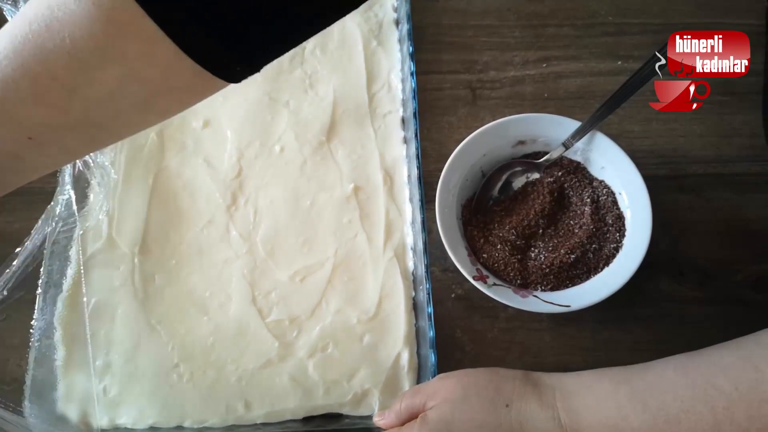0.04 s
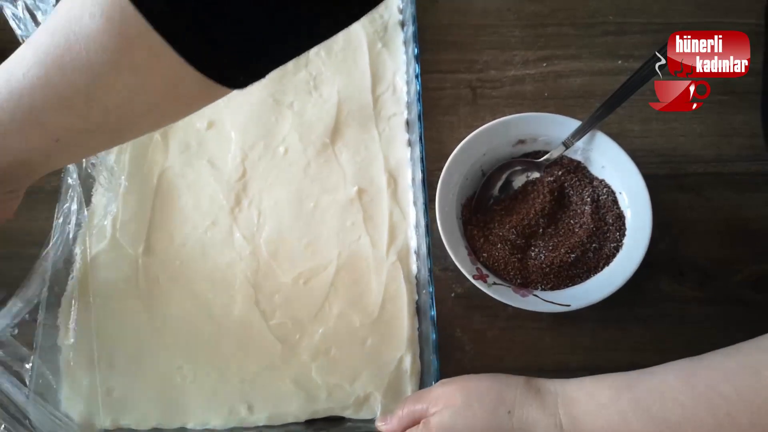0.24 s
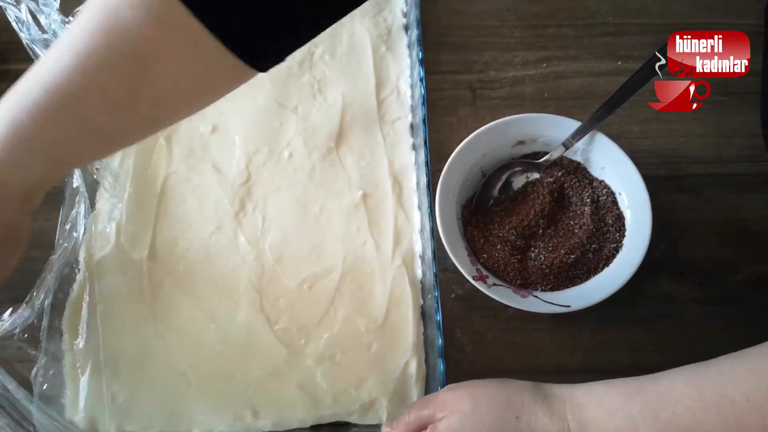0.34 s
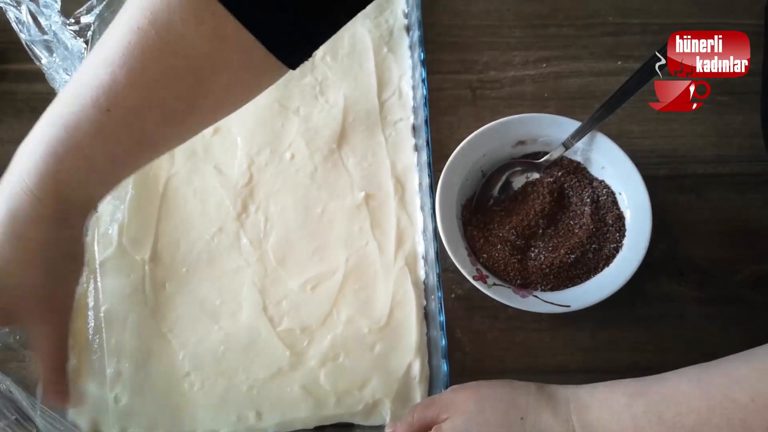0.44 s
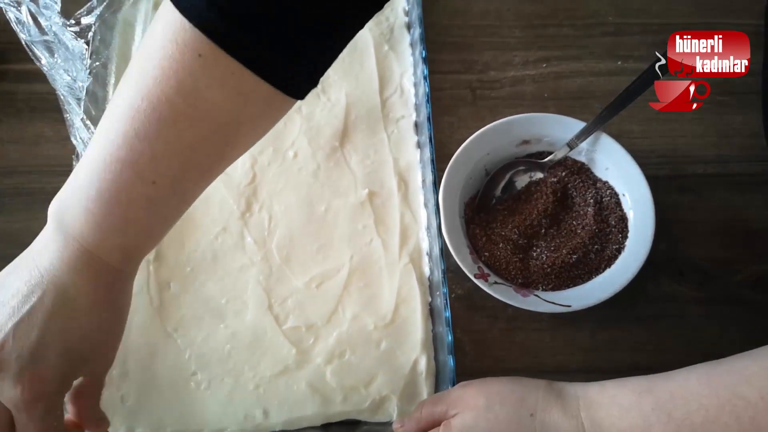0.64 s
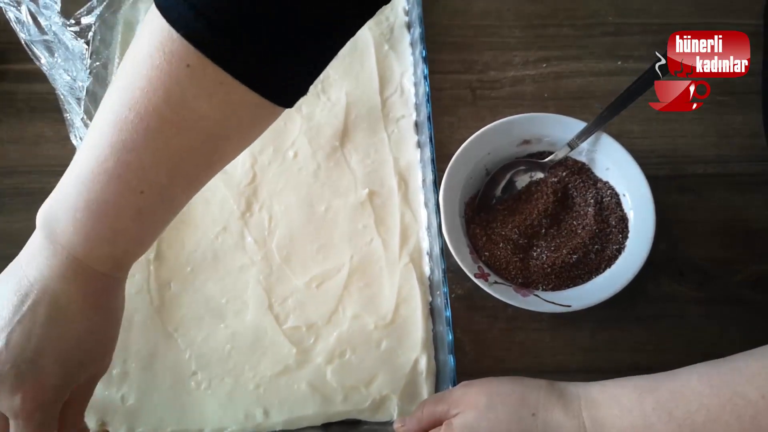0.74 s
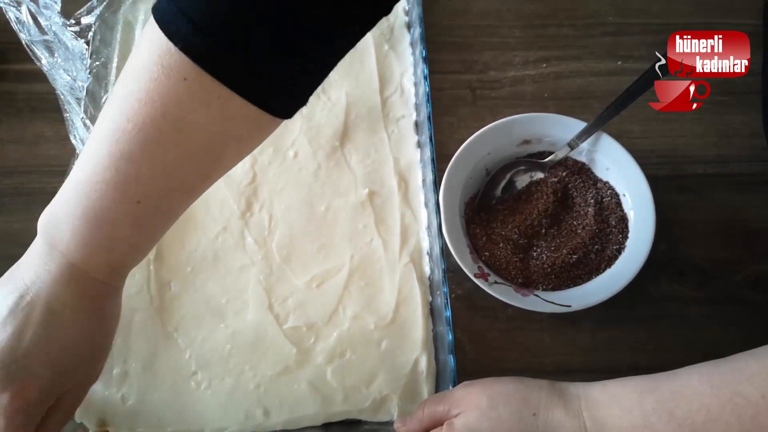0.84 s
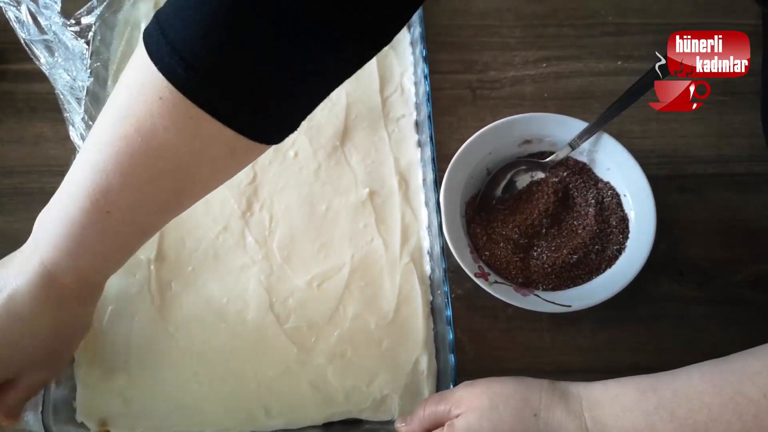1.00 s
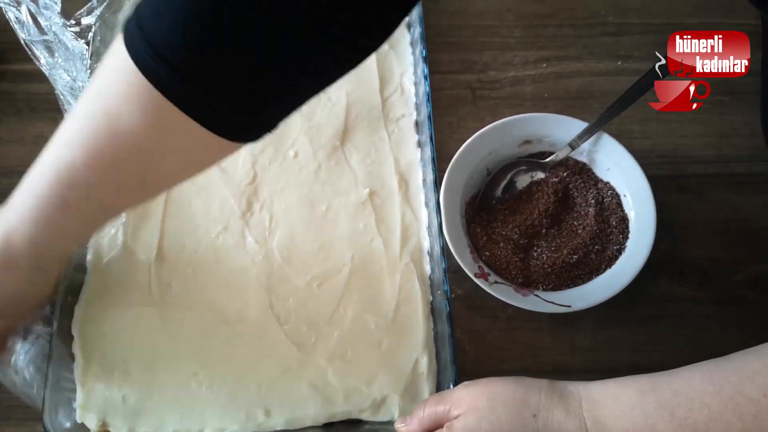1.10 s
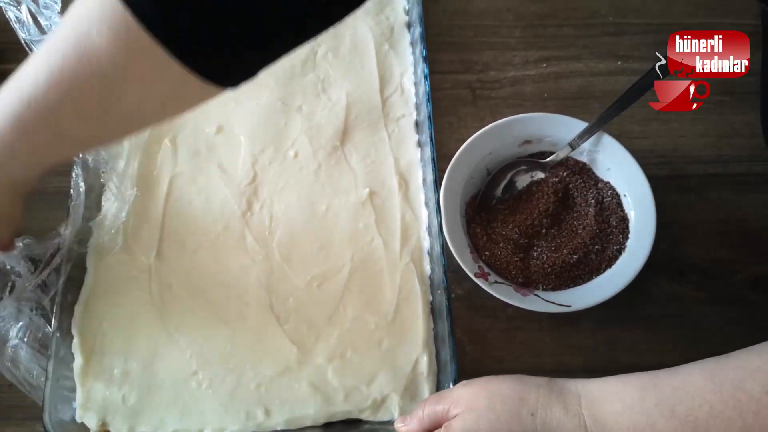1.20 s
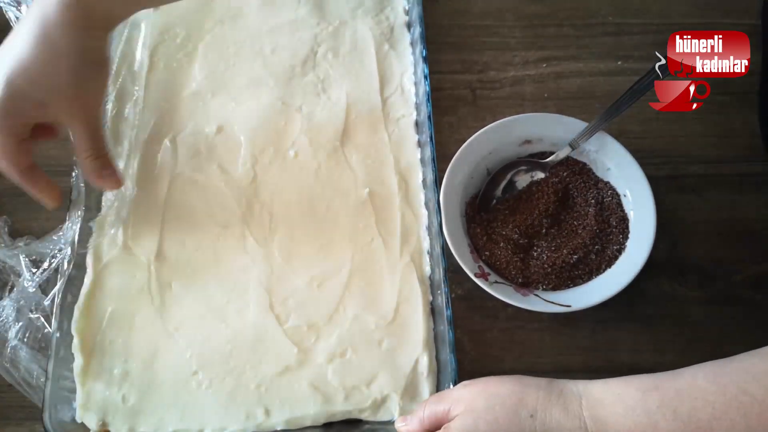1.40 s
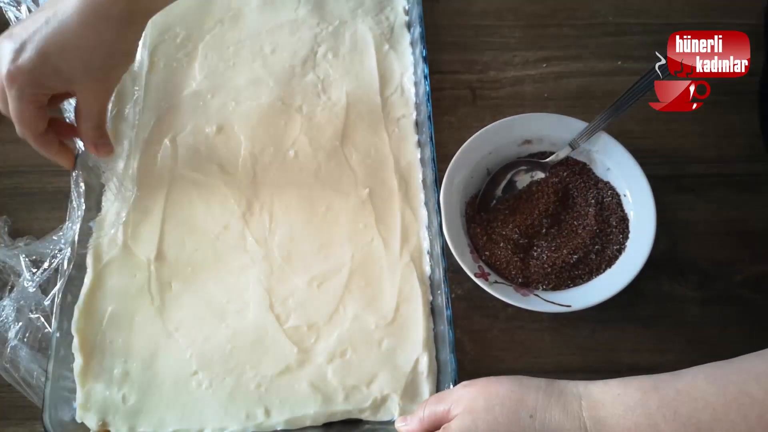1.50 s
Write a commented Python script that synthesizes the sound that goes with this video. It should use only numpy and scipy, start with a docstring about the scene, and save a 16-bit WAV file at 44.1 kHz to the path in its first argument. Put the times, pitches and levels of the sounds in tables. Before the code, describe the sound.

Cling film crinkling off a glass dish, two early knocks on wood, then a burst of sharp snaps

```python
"""A quiet kitchen: cling film is peeled off a glass dish on a wooden table, close to a stereo microphone.
The film is dense decaying crackle times noise, with loud snaps of tick, burst and short ring.
Half-sine knocks ring the dish, crack at the contact and boom in the table top.
Low noise from the tugging hands rumbles through the wood and the dish scuffs on it;
a diffuse room tail and faint air noise lie behind."""
import sys
import numpy as np
from scipy import signal
from scipy.fft import rfft, irfft, next_fast_len
from scipy.io import wavfile
from scipy.ndimage import uniform_filter1d, map_coordinates

SR = 44100
rng = np.random.default_rng(int(sys.argv[2]) if len(sys.argv) > 2 else 0)


def int16_out(signal):
    """Quantize to a 16-bit WAV file."""
    q = np.round(np.clip(np.atleast_2d(signal).T, -1, 1) * 32767)
    wavfile.write(sys.argv[1], SR, q.astype(np.int16))


N = 68355

# Pull on the film. Each row: time in seconds, crackle level in dB, low rustle relative to it in dB.
FILM_PULL = [(0, -37.5, 0.5), (.016, -41, -1), (.068, -62.5, -2), (.112, -50, -6), (.146, -65.5, -9),
             (.168, -52, -3), (.21, -41, -7.5), (.246, -54.5, -0.5), (.32, -59.5, 12.5), (.44, -64.5, -8),
             (.568, -98, -24), (.59, -64.5, 4.5), (.619, -63.5, 0), (.628, -50.5, 0), (.655, -59, 2.5),
             (.706, -61, -1), (.711, -43, 2), (.777, -57, 1), (.782, -43, 1), (.892, -42, -6.5),
             (.906, -34, -8), (.918, -44.5, -5), (.99, -42.5, -3), (1.018, -41, 0.5), (1.04, -30.5, -5.5),
             (1.075, -38.5, -1), (1.16, -47.5, -5), (1.272, -92.5, -2.5), (1.48, -83.5, 8.5),
             (1.502, -58, -4), (1.55, -79.5, 7.5)]
# Loud single snaps. Each row: start in seconds, level in dB, burst T60 in seconds,
# pitch of the taut patch in Hz, its ring relative to the level in dB.
FILM_SNAPS = [(0.093, -64, .03, 3740, -8), (0.156, -52, .02, 4340, 3), (0.1695, -29.5, 0.0139, 3300, -5),
              (0.177, -38, 0.016, 3580, -15), (0.207, -34, .025, 3470, -35), (0.315, -42, 0.025, 2900, -21),
              (.385, -42.5, 0.0066, 3060, -27.5), (0.71, -27, 0.0074, 2140, 2.5),
              (0.7368, -43.5, 0.018, 3160, 4), (.772, -37.5, 0.018, 2330, -11),
              (0.7806, -23, 0.015, 2337, 5.5), (0.804, -31, 0.016, 1790, -7.5),
              (0.8209, -32, .015, 1900, -1.5), (0.864, -33, .015, 1650, -3), (.901, -32, 0.0087, 2560, -20),
              (0.9034, -22.5, 0.0073, 2780, -18), (.9765, -31.5, 0.0083, 2980, -10),
              (0.9994, -19.5, 0.0055, 3800, -14), (1.0232, -22.5, .012, 3660, -13),
              (1.032, -21.5, 0.019, 1750, -6.5), (1.0436, -30.5, 0.0079, 1770, 6.5),
              (1.1012, -25.5, 0.029, 1180, -6.5), (1.1475, -29.5, .015, 1990, -12.5),
              (1.5013, -42, .008, 1510, -12.5)]
# Bright colour of crackle and snaps. Each row: frequency in Hz, gain in dB.
FILM_BRIGHT_COLOUR = [(2500, -31.5), (3500, -4.5), (6200, -3.5), (7700, 0), (9500, -2), (11000, -11.5),
                      (14500, -13.5), (16400, -31)]
# Colour of the low rustle. Each row: frequency in Hz, gain in dB.
FILM_RUSTLE_COLOUR = [(200, -7), (400, -15), (600, -22), (900, -6.5), (1400, -4.5), (2100, 0.5), (3000, -3),
                      (4500, -17)]
# Knocks of dish on table. Each row: start in seconds, level in dB, contact in ms, table boom in dB.
DISH_KNOCKS = [(0.22, -14.5, 0.16, -33.5), (0.2584, -21, 0.3, -33.5), (0.4968, -48, 0.28, -85),
               (1.037, -35, 0.53, -57)]
# Short rings of dish and table. Each row: frequency in Hz, level in dB, T60 in seconds.
DISH_MODES = [(194, -15.5, 0.02), (245, -1.5, 0.019), (306, -6, 0.05), (387.4, -14, 0.099), (412, -15, .05),
              (510, -19, 0.05), (720, -23, 0.053), (774, -19, 0.052), (989, -14.5, 0.04), (1146, -14, 0.05),
              (1393, -1.5, 0.022), (1695, -3.5, 0.035), (2024, -4.5, 0.028), (2580, -2.5, 0.01),
              (3060, -10.5, 0.01)]
# Colour of the contact crack. Each row: frequency in Hz, gain in dB.
CRACK_COLOUR = [(300, -16), (800, -1), (1500, -3.5), (2800, -15.5), (3500, -24), (8000, -28), (15000, -50)]
# Long rings of the table top. Each row: frequency in Hz, level in dB, T60 in seconds.
TABLE_MODES = [(29.8, -2.5, 0.39), (61.5, 2.5, 1), (90.5, 3, 0.15), (126.2, 2, 0.73)]
# Level of the table boom: drops in two steps, later returns. Each row: time in seconds, gain in dB.
BOOM_LEVEL = [(.43, 3.5), (.455, -1.5), (.58, -1.5), (.62, -33), (.9, -31), (1.0, -1)]
# Tugging felt through the table. Each row: time in seconds, level in dB.
TUG_LEVEL = [(0, -43.5), (.07, -56.5), (.15, -62.5), (.6, -56), (.72, -65.5), (.9, -52), (1.01, -53.5),
             (1.04, -48), (1.07, -51), (1.15, -53), (1.2, -69), (1.27, -60), (1.55, -64.5)]
# Colour of the tugging. Each row: frequency in Hz, gain in dB.
TUG_COLOUR = [(20, 0), (35, -4), (90, -7), (200, -15), (400, -46.5)]
# Dish scuffing on the wood. Each row: time in seconds, level in dB.
SCUFF_LEVEL = [(0, -54.5), (.14, -107), (.18, -60.5), (.21, -55.5), (.49, -64), (.51, -48), (.57, -59.5),
               (.6, -83), (.96, -67.5), (1.0, -56.5), (1.05, -52), (1.11, -55), (1.17, -77), (1.2, -82),
               (1.55, -88)]
# Colour of the scuffing. Each row: frequency in Hz, gain in dB.
SCUFF_TONE = [(120, -20.5), (190, -3.5), (300, -2.5), (400, 7.5), (550, -5.5), (800, -18.5)]
# Colour of the room's air noise. Each row: frequency in Hz, gain in dB.
AIR_COLOUR = [(100, 10.5), (180, -2), (700, -0.5), (1500, 3.5), (5000, -5.5), (10000, -8.5), (16000, -25)]

CRACKLES_PER_S, CRACKLE_SPREAD_DB, CRACKLE_T60_S = 2500, 1.5, 0.0095
TICK_DB, PATCH_T60_S, PATCH_HIGHPASS_HZ = 9, 0.021, 785  # tick is relative to its snap
FILM_PAN_DB, FILM_LAG_S, FILM_LIKENESS = 3, 0.000672, 0.07  # louder and earlier on the left
CRACK_DB, CRACK_T60_S, EDGE_DB = 1.5, 0.013, 9.5  # edge: the clean click of a knock
TABLE_YIELD_S, TABLE_LAG_S = 0.002, 0.00038
TUG_RING_DB = 0  # relative to the unrung thud
SWELL_START_S, SWELL_LENGTH_S, SWELL_DB = 1.31, 0.26, -55.5
ROOM_T60_S, ROOM_TREBLE_T60_S, ROOM_SPLIT_HZ = 0.38, 0.26, 5600
ROOM_RISE_S, ROOM_SIDE_HIGHPASS_HZ = 0.0053, 350
FILM_WET_DB, KNOCK_WET_DB, CRACK_WET_DB = -8, -4.5, 0
AIR_DB = -68
GATE_DB, GATE_DEPTH_DB, GATE_KNEE_DB, GATE_WINDOW_S, GATE_HIGHPASS_HZ = -57, 5, 3, 0.036, 298
TOP_HZ = 16400


def amp(db):
    """Amplitude factor from dB."""
    return 10 ** (np.asarray(db) / 20)


def unit(x):
    """Scale to an rms of one."""
    return x / np.sqrt(np.mean(x ** 2))


def curve(table, axis=1):
    """One column of a time table, interpolated at every sample."""
    table = np.array(table)
    return np.interp(np.arange(N) / SR, table[:, 0], table[:, axis])


def colour(x, points):
    """Filter by (Hz, dB) points, -70 dB outside them; white noise keeps its rms."""
    hz, db = np.array(points, float).T
    size = next_fast_len(N + 4096)
    f = np.maximum(np.arange(size // 2 + 1) * SR / size, 1)
    gain = amp(np.interp(np.log(f), np.log(hz), db, left=-70, right=-70))
    return irfft(rfft(x, size) * unit(gain), size)[..., :N]


def highpass(x, hz):
    """Second-order Butterworth high-pass."""
    return signal.sosfilt(signal.butter(2, hz, "high", fs=SR, output="sos"), x)


def spikes(times_s, sizes):
    """Single-sample impulses."""
    out = np.zeros(N)
    index = np.clip((np.asarray(times_s) * SR).astype(int), 0, N - 1)
    np.add.at(out, index, sizes)
    return out


def fade(x, t60_s):
    """Give every impulse a sudden onset and an exponential tail."""
    decay = np.exp(-np.log(1000) / (t60_s * SR))
    return signal.lfilter([1], [1, -decay], x)


def ring(x, modes):
    """Sum of damped two-pole resonances, each of unit amplitude times its dB."""
    out = 0
    for hz, db, t60_s in modes:
        r = np.exp(-np.log(1000) / (t60_s * SR))
        w = 2 * np.pi * hz / SR
        out = out + amp(db) * signal.lfilter([0, r * np.sin(w)], [1, -2 * r * np.cos(w), r * r], x)
    return out


def delay(x, seconds):
    """Shift later by a fractional number of samples."""
    return map_coordinates(x, [np.arange(N) - seconds * SR], mode="nearest")


def wide_noise():
    """Two channels of noise that are partly alike, as from a wide sheet."""
    shared, left, right = rng.standard_normal((3, N))
    like = np.clip(FILM_LIKENESS, 0, 1)
    return np.sqrt(like) * shared + np.sqrt(1 - like) * np.array([left, right])


def crackle_envelope():
    """Random tiny snaps with decaying tails, evened out and then set to the pull."""
    happens, size = rng.random((N, 2)).T
    hits = (happens < CRACKLES_PER_S / SR) * amp(-CRACKLE_SPREAD_DB * np.log(1 - size))
    crackle = fade(hits, CRACKLE_T60_S)
    local_rms = np.sqrt(uniform_filter1d(crackle ** 2, size=1500) + 1e-9)
    return crackle / local_rms * amp(curve(FILM_PULL))


def film():
    """Crackle in a bright and a low colour; each loud snap is a tick, a burst and a taut patch's ring."""
    crackle = crackle_envelope()
    bursts, ticks, rings = crackle.copy(), np.zeros(N), np.zeros(N)
    for start_s, db, t60_s, hz, ring_db in FILM_SNAPS:
        snap = spikes([start_s], amp(db))
        bursts = bursts + fade(snap, t60_s) / 2
        ticks = ticks + amp(TICK_DB) * snap
        rings = rings + ring(snap, [(hz, ring_db, PATCH_T60_S)])
    bright = colour(bursts * wide_noise() + ticks, FILM_BRIGHT_COLOUR)
    rustle = crackle * amp(curve(FILM_PULL, axis=2)) * wide_noise()
    return bright + colour(rustle, FILM_RUSTLE_COLOUR) + highpass(rings, PATCH_HIGHPASS_HZ)


def knocks():
    """Half-sine pushes ring the dish; the heavy table top yields more slowly; the contact itself cracks."""
    pushes, boom = np.zeros(N), np.zeros(N)
    t = np.arange(N) / SR
    slow = np.hanning(max(int(TABLE_YIELD_S * SR), 3))
    for start_s, db, contact_ms, boom_db in DISH_KNOCKS:
        contact_s = contact_ms / 1000
        phase = np.clip((t - start_s) / contact_s, 0, 1)
        push = -np.sin(np.pi * phase) / (contact_s * SR * 2 / np.pi)  # near unit area
        softened = np.convolve(-push, slow / slow.sum())[:N]
        pushes = pushes + amp(db) * push
        boom = boom + amp(boom_db) * ring(softened, TABLE_MODES)
    burst = fade(pushes, CRACK_T60_S) * rng.standard_normal(N)
    crack = amp(CRACK_DB) * colour(burst, CRACK_COLOUR)
    crack = crack + amp(EDGE_DB) * colour(pushes, CRACK_COLOUR)
    return ring(pushes, DISH_MODES), crack, boom * amp(curve(BOOM_LEVEL))


def tugging():
    """Low noise from the hands, partly rung through the table top."""
    direct, driving = colour(rng.standard_normal((2, N)), TUG_COLOUR)
    rung = unit(ring(driving, TABLE_MODES))
    return amp(curve(TUG_LEVEL)) * unit(direct + amp(TUG_RING_DB) * rung)


def low_swell():
    """A faint low swell at the table's second ring, near the end."""
    t = np.arange(N) / SR
    swell = np.sin(np.pi * np.clip((t - SWELL_START_S) / SWELL_LENGTH_S, 0, 1))
    return amp(SWELL_DB) * swell * np.sin(2 * np.pi * TABLE_MODES[1][0] * t)


def scuffing():
    """Friction of the dish on the wood, as coloured noise."""
    return amp(curve(SCUFF_LEVEL)) * colour(wide_noise(), SCUFF_TONE)


def room(x):
    """A diffuse tail, shared by both ears in the bass and different above; the treble dies first."""
    t = np.arange(SR // 2) / SR
    mid, side = rng.standard_normal((2, len(t)))
    side = highpass(side, ROOM_SIDE_HIGHPASS_HZ)
    noise = np.array([mid + side, mid - side])
    low = signal.sosfilt(signal.butter(2, ROOM_SPLIT_HZ, fs=SR, output="sos"), noise)
    tail = low * amp(-60 * t / ROOM_T60_S) + (noise - low) * amp(-60 * t / ROOM_TREBLE_T60_S)
    tail = tail * np.clip(t / ROOM_RISE_S, 0, 1)
    tail = tail / np.sqrt(np.mean(np.sum(tail ** 2, axis=1)))  # unit energy per ear on average
    return signal.fftconvolve(x[None], tail, axes=1)[:, :N]


def air():
    """Steady noise of the quiet room, independent in the two channels."""
    return amp(AIR_DB) * colour(rng.standard_normal((2, N)), AIR_COLOUR)


def scene():
    """Mix the film, knocks, wood, scuffing, room tail and air."""
    left, right = film()
    dish, crack, boom = knocks()
    near_left = left * amp(FILM_PAN_DB / 2)
    near_right = delay(right, FILM_LAG_S) * amp(-FILM_PAN_DB / 2)
    near = np.array([near_left, near_right])
    wet = room(amp(FILM_WET_DB) * left + amp(KNOCK_WET_DB) * dish + amp(CRACK_WET_DB) * crack)
    wood = boom + tugging() + low_swell()
    wood = np.array([wood, delay(wood, TABLE_LAG_S)])
    return near + dish + crack + wood + scuffing() + wet + air()


def record(dry):
    """A soft noise gate turns quiet moments down; the recorder cuts the top."""
    heard = highpass(dry.mean(axis=0), GATE_HIGHPASS_HZ)
    power = uniform_filter1d(heard ** 2, int(GATE_WINDOW_S * SR))
    level_db = 10 * np.log10(np.abs(power) + 1e-14)
    closed = .5 - .5 * np.tanh((level_db - GATE_DB) / GATE_KNEE_DB)  # 0 open, 1 closed
    gated = dry * amp(-GATE_DEPTH_DB * closed)
    return signal.sosfilt(signal.ellip(10, .2, 80, TOP_HZ, fs=SR, output="sos"), gated)


dry = scene()
out = record(dry)
int16_out(out)
```